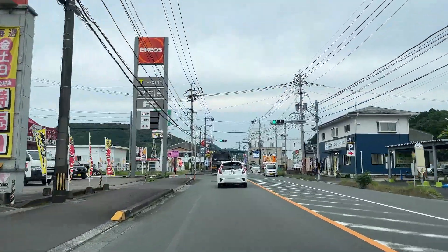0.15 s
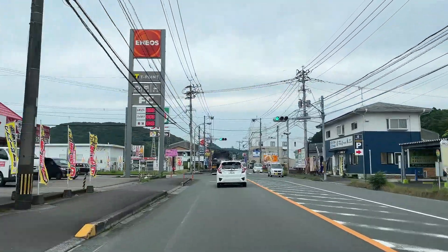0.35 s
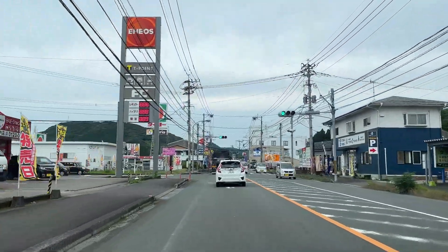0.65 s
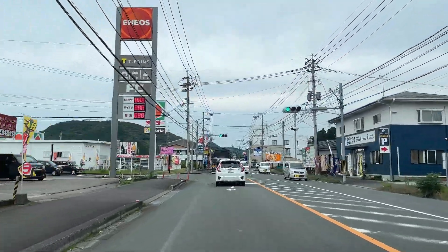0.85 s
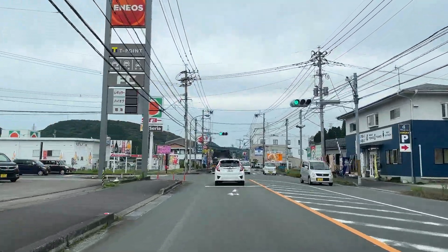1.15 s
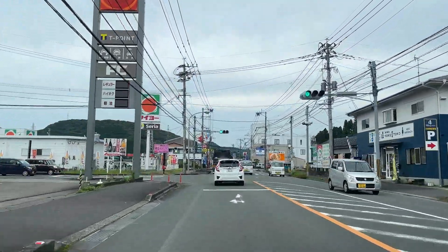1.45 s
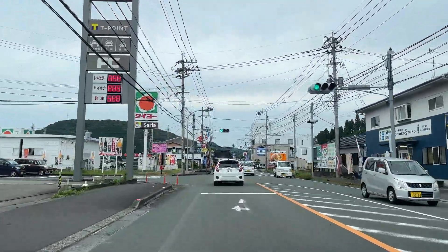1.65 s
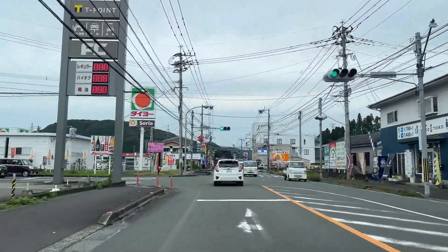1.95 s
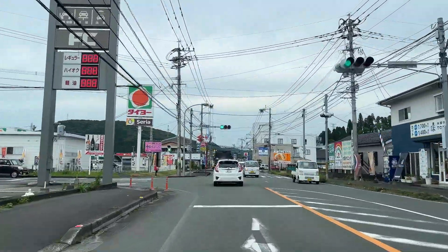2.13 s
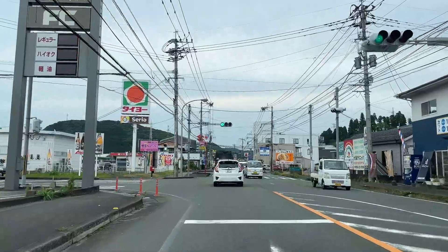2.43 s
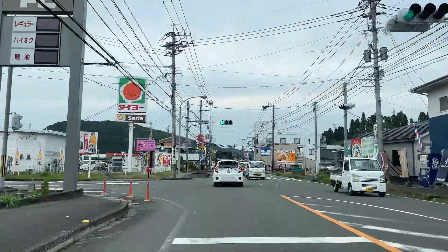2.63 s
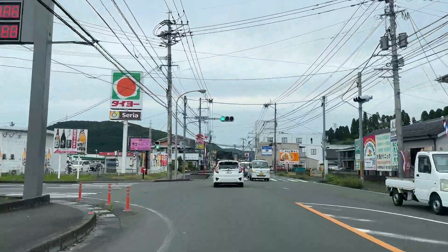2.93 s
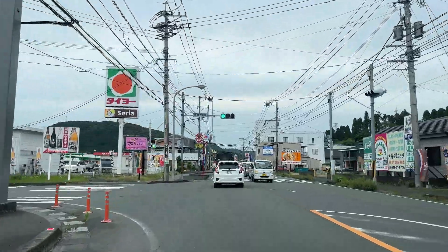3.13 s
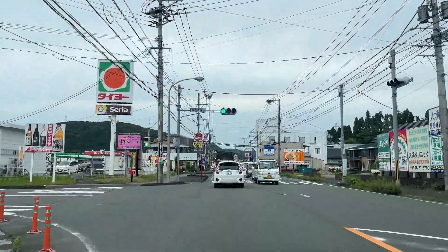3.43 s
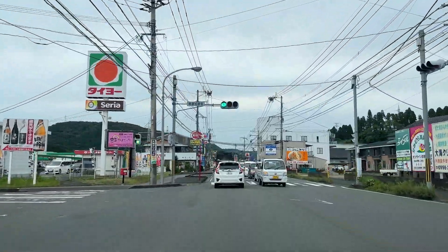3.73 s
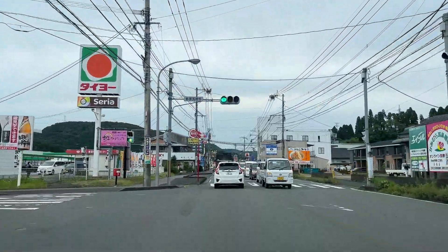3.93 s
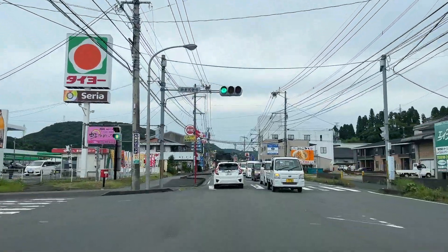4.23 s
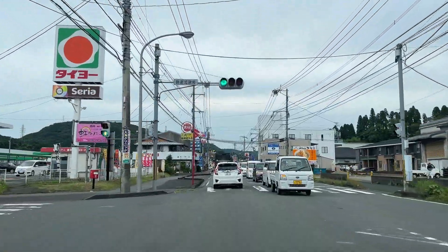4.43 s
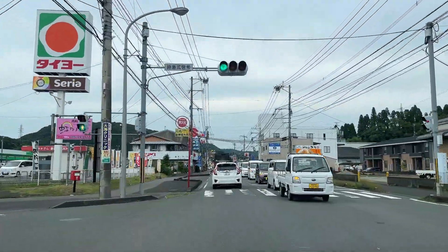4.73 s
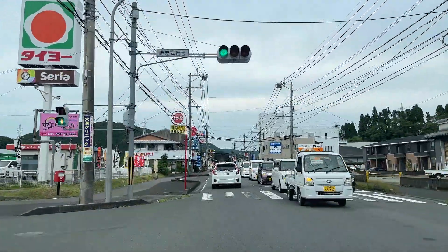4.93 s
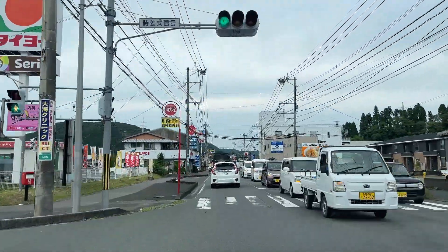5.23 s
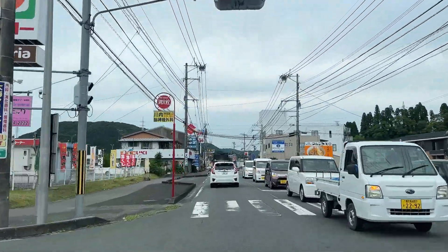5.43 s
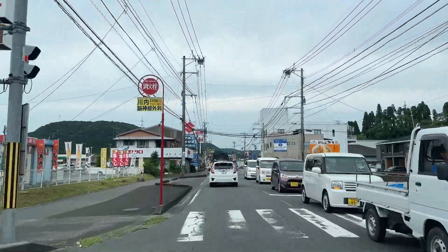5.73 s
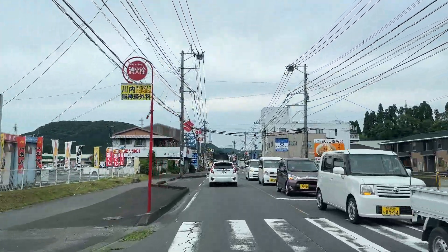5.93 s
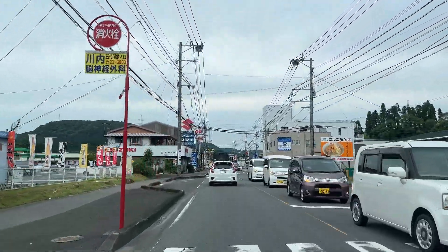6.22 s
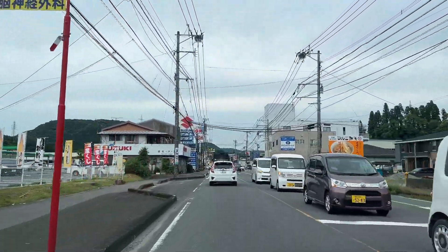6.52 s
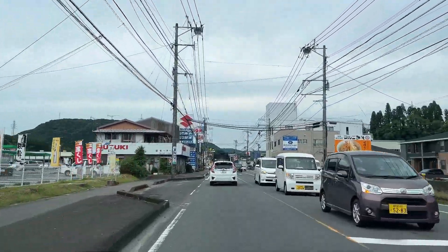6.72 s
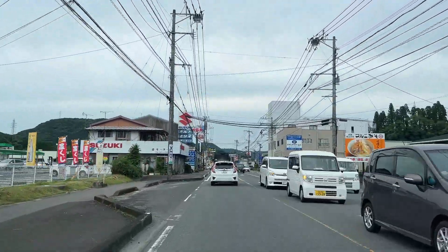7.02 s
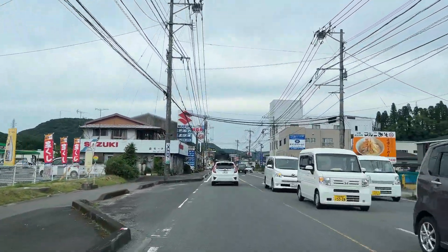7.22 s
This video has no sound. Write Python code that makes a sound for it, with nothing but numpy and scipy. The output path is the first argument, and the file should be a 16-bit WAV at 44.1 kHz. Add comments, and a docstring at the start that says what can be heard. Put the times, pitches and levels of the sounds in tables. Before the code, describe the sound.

The interior of a small car driving steadily through town, heard in stereo from the dashboard. Deep engine and road rumble is continuous, with muffled tyre roar, soft rush and faint hiss. In the first 0.8 s there are small bright ticks, dull seam thuds and a few sharp plastic clicks, strongest near 0.7 s. From 0.9 to 2.5 s it smooths out, with a brief change in tyre sound around 1.5 s and one light click at 1.75 s. Faint trim chatter returns from 2.6 s, clearer at 3.2 s. Thuds and rattles hit at 3.75, 4.03 and 4.3 s, with gritty rubbing, then a dense clatter at 5.0-5.3 s with a strong boom. After that the asphalt sounds coarser and louder, with panel hums, low cabin booms, knocks at 5.75 and 6.4 s, a hard clack at 6.9 s, and small clicks until 7.4 s.

```python
"""Small car in town, heard from the dashboard

Low engine and road rumble, tyre roar, rush and hiss surround a booming cabin; they are shaped noise.
Wheels knock over seams with dull thuds and ringing panels. Loose plastic trim clicks, rubs and chatters:
bursts of noise in its resonances. Small parts fidget when the rumble is strong, and jolts make a panel hum.
The asphalt gets coarser towards the end."""
import sys
import numpy as np
from scipy import signal
from scipy.fft import rfft, irfft, next_fast_len
from scipy.io import wavfile
from scipy.ndimage import uniform_filter1d

SR = 44100
rng = np.random.default_rng(int(sys.argv[2]) if len(sys.argv) > 2 else 0)


def unload_audio(sound):
    """Save the sound as a 16-bit wav file, at the path given as the first command line argument."""
    columns = np.transpose(np.atleast_2d(sound))
    # keep every value between -1 and 1, then stretch to whole-number steps
    steps = np.round(np.clip(columns, -1, 1) * 32767)
    wavfile.write(sys.argv[1], SR, steps.astype(np.int16))


N = 325017
T = np.arange(N) / SR  # s


def gain_of(db):
    """Turns decibels into an amplitude factor."""
    return 10 ** (np.asarray(db) / 20)


def evened(x):
    """Scales a signal to unit power."""
    return x / np.sqrt(np.mean(x ** 2) + 1e-20)


def read(points, hz):
    """A spectrum in dB, joined by straight lines over log frequency."""
    point_hz, value = np.transpose(points)
    return np.interp(np.log(hz + 1), np.log(point_hz + 1), value)


def beyond(points, hz):
    """Above its last point a spectrum falls away steeply."""
    return -60 * np.log10(np.maximum(hz / points[-1][0], 1))


def curve(rows):
    """A time table read at every sample."""
    return np.interp(T, *np.transpose(rows))


def bell(crest_s, half_s):
    """A smooth rise and fall around its crest."""
    return np.exp(-((T - crest_s) / half_s) ** 2)


def swells(rows):
    """The summed strength of a table of swells."""
    return sum(gain_of(level_db) * bell(crest_s, half_s) for crest_s, level_db, half_s in rows)


def add(mix, start_s, sound):
    """Mixes a stereo sound in at its start time."""
    part = mix[:, max(round(start_s * SR), 0):][:, :sound.shape[1]]
    part += sound[:, :part.shape[1]]


def stereo(mid, side):
    """Left and right from the common part and the part that differs."""
    return np.array([mid + side, mid - side])


def noise(colour_db, size=N):
    """Noise of unit power whose spectrum is the function colour_db of frequency."""
    padded = next_fast_len(size, True)
    hz = np.fft.rfftfreq(padded, 1 / SR)
    spectrum = rfft(rng.standard_normal(padded)) * gain_of(colour_db(hz))
    return evened(irfft(spectrum, padded)[:size])


def wash(points, size=N):
    """Noise with a tabled spectrum."""
    return noise(lambda hz: read(points, hz) + beyond(points, hz), size)


def drift(rate_hz, size=N):
    """Slow chance of unit size."""
    return noise(lambda hz: -20 * np.log10(1 + (hz / rate_hz) ** 2), size)


def steadied(x, size=5000):
    """Takes the slow swells out of a narrow noise and keeps its quick beating."""
    power = uniform_filter1d(uniform_filter1d(x ** 2, size), size // 2)
    return x / np.sqrt(power + 1e-6)


def resonance(centre_hz, width_hz):
    """Road noise ringing in one narrow resonance."""
    return noise(lambda hz: -16 * np.log10(1 + (2 * (hz - centre_hz) / width_hz) ** 2))


def sway(hz, wander_hz):
    """One mode swinging freely at unit power, its pitch wandering a little."""
    cycles = np.cumsum(hz + wander_hz * drift(12)) / SR
    return np.sqrt(2) * np.sin(2 * np.pi * (cycles + rng.random()))


def ripple(spacing_hz, hz):
    """Many small panel resonances: random hills and valleys of unit size over frequency."""
    grid_hz = np.arange(0, SR / 2, spacing_hz)
    return np.interp(hz, grid_hz, rng.standard_normal(len(grid_hz)))


def leak(points, ripple_db=2, size=N):
    """Noise that comes in through the panels and takes on their ripple."""
    return noise(lambda hz: read(points, hz) + beyond(points, hz) + ripple_db * ripple(45, hz), size)


# spectrum of the rumble: pitch_hz, relative level_db [dB per Hz]
RUMBLE_SPECTRUM = [(15, -47), (25, -22.5), (35, -2), (47, -4), (58, 3), (68, -4.5), (80, -8.5),
                   (100, -10.5), (140, -18), (200, -28), (300, -74)]
# the rumble over time, before its lift: time_s, level_db
RUMBLE_LEVEL = [(0.0, -36), (0.79, -40), (0.85, -43), (2.44, -44), (2.83, -39), (3.33, -37.5), (3.61, -43),
                (4.37, -40), (4.7, -43.5), (4.95, -40.5), (5.62, -37.5), (5.85, -41.5), (6.85, -36),
                (7.37, -41.5)]
# dips in the road that heave the floor: crest_s, level_db, half_length_s
HEAVES = [(0.18, -27, 0.016), (0.33, -30, 0.01), (0.58, -29, 0.0099), (0.7, -32.5, 0.09),
          (0.92, -36, 0.034), (1.8, -35.5, 0.022), (2.65, -31, 0.018), (2.79, -30.5, 0.035),
          (3.12, -35, 0.06), (3.3, -33.5, 0.076), (3.76, -27.5, 0.018), (5.5, -28.5, 0.013),
          (5.76, -28.5, 0.041), (6.36, -29.5, 0.017), (6.76, -28.5, 0.021)]


def rumble(lift_db=2.5, waver_db=0.98, heave_hz=54, heave_width_hz=24):
    """Engine and road rumble come through the floor; each dip in the road heaves it at a deep pitch."""
    level_db = curve(RUMBLE_LEVEL) + lift_db + waver_db * drift(27)
    rolling = gain_of(level_db) * steadied(wash(RUMBLE_SPECTRUM), size=3600)
    heaving = swells(HEAVES) * steadied(resonance(heave_hz, heave_width_hz), size=2400)
    return rolling + heaving


# panels that drone all the way: pitch_hz, width_hz, level_db
DRONES = [(374, 14, -63), (427.6, 18, -68)]
# jolts that make the deeper panel hum out, before the mid and side levels: crest_s, level_db, half_length_s
JOLTS = [(.97, -48, 0.011), (1.3, -45, 0.023), (1.62, -50, 0.04), (5.28, -46, 0.022), (5.64, -48, .016),
         (5.76, -39.5, 0.024), (6.14, -46.5, 0.012), (6.205, -42.5, .018), (6.275, -44.5, .02),
         (6.43, -44.5, 0.035), (6.72, -48, 0.014), (6.995, -41.5, 0.021), (7.33, -46, 0.02)]


def drone(waver_db=2, wander_hz=14, mid_db=-3, side_db=-4):
    """Body panels sing softly at their own pitches; a jolt makes the deeper one hum out."""
    singing = sum(gain_of(level_db + waver_db * drift(2.6)) * resonance(pitch_hz, width_hz)
                  for pitch_hz, width_hz, level_db in DRONES)
    deep_hz = DRONES[0][0]
    mid = gain_of(mid_db) * sway(deep_hz, wander_hz)
    side = gain_of(side_db) * sway(deep_hz, wander_hz)
    return singing + swells(JOLTS) * stereo(mid, side)


# coarseness of the asphalt, of which only the departure from the mean counts: time_s, level_db
COARSENESS = [(0.0, -53.5), (0.31, -53.5), (0.57, -50.5), (0.79, -50.5), (0.86, -55), (1.62, -54.5),
              (2.03, -54), (2.81, -55), (3.0, -52), (3.84, -51.5), (4.19, -50), (4.82, -50.5), (5.17, -46),
              (5.77, -47), (6.8, -47), (7.14, -47), (7.37, -44.5)]
# patches of asphalt that change the tyre sound: crest_s, roar_lift_db, half_length_s, rush_lift_db
PATCHES = [(0.753, 5.5, 0.027, -4), (1.327, 4.5, 0.053, 4), (1.484, 7, 0.022, 1), (1.607, 5, 0.074, 4),
           (4.054, 7.5, 0.033, 1), (5.24, 5.5, 0.053, 0), (5.767, 8.5, 0.011, 1), (6.207, 1.5, 0.04, 1),
           (6.44, 6.5, 0.033, 4.5), (6.981, 6, 0.045, 0)]


def road_surface():
    """The asphalt under the tyres in dB: its coarseness, then what its patches do to roar and rush."""
    coarse_db = curve(COARSENESS) - curve(COARSENESS).mean()
    roar_db = sum(lift_db * bell(crest_s, half_s) for crest_s, lift_db, half_s, _ in PATCHES)
    rush_db = sum(lift_db * bell(crest_s, half_s) for crest_s, _, half_s, lift_db in PATCHES)
    return coarse_db, roar_db, rush_db


# spectrum of the roar common to both ears: pitch_hz, relative level_db [dB per Hz]
ROAR_MID = [(90, -52.5), (160, 4), (195, 1), (240, -2.5), (320, -7.5), (372, -8), (402, -12), (432, -11.5),
            (480, -13.5), (620, -23), (900, -49), (1500, -70.5)]
# spectrum of the roar that differs between the ears: pitch_hz, relative level_db [dB per Hz]
ROAR_SIDE = [(20, -34.5), (50, -3), (80, -3), (105, -9.5), (140, -1.5), (220, -8.5), (290, -4.5),
             (365, -4.5), (430, -12.5), (490, -20.5), (565, -10), (650, -26.5), (900, -26), (1500, -68.5)]


def tyres(coarse_db, patch_db, mid_db=-49, side_db=-49.5, follow=0.95, grain_db=2.0):
    """The tyres roar with the coarseness of the asphalt and flutter with its grain."""
    mid = gain_of(mid_db) * steadied(wash(ROAR_MID))
    side = gain_of(side_db) * wash(ROAR_SIDE)
    return stereo(mid, side) * gain_of(follow * coarse_db + patch_db + grain_db * drift(27))


# spectrum of the tyre rush: pitch_hz, relative level_db [dB per Hz]
RUSH = [(300, -4), (700, 7.5), (1000, 0.5), (1170, 3.5), (1500, 0.5), (2000, -6), (3000, -13.5),
        (5000, -31), (7000, -46.5)]
# spectrum of the hiss: pitch_hz, relative level_db [dB per Hz]
HISS = [(1000, -16.5), (2200, -2), (3000, -3.5), (4300, -3), (5100, -9), (5800, -19), (6800, -28),
        (9000, -22), (13000, -19.5), (16000, -40)]
# the hiss over time, before its trim in level: time_s, level_db
HISS_LEVEL = [(0.0, -73), (0.29, -79), (0.79, -80), (0.84, -85), (1.4, -82.5), (1.7, -78), (2.4, -80),
              (2.81, -82), (3.3, -70), (3.78, -84), (4.23, -78), (4.43, -71.5), (4.78, -77), (5.13, -71),
              (6.4, -78), (7.27, -75), (7.37, -74)]


def air(coarse_db, patch_db, rush_db=-68, rush_side_db=2.0, follow=0.75, hiss_db=-2, flutter_db=2.1,
        hiss_share=0.73):
    """Tyre rush and hiss leak in through the panels, flutter, and change with each patch of road."""
    flutter = flutter_db * drift(8.8) + patch_db
    rush = stereo(leak(RUSH), gain_of(rush_side_db) * leak(RUSH))
    hiss = stereo(leak(HISS), leak(HISS))
    rush_gain = gain_of(rush_db + follow * coarse_db + flutter)
    hiss_gain = gain_of(curve(HISS_LEVEL) + hiss_db + hiss_share * flutter)
    return rush * rush_gain + hiss * hiss_gain


# the cabin boom over time, before its lift: time_s, level_db
BOOM_LEVEL = [(0.0, -44), (0.43, -51.5), (0.72, -45), (1.31, -55.5), (1.6, -47.5), (3.2, -49.5),
              (3.69, -44.5), (5.23, -45), (5.56, -45), (5.7, -42.5), (7.27, -38), (7.37, -40)]
# hard shakes that swell the boom: crest_s, level_db, half_length_s
SHAKES = [(1.55, -38.5, 0.074), (3.62, -40.5, 0.098), (5.211, -22, 0.028), (5.945, -33.5, 0.03),
          (6.082, -28, 0.031), (6.5, -34.5, 0.018), (7.15, -26.5, 0.024)]
BOOM_HZ, BOOM_WIDTH_HZ = 139.78, 12.1


def boom(lift_db=3.5, waver_db=1.8):
    """The road drives one air resonance of the cabin; hard shakes make it swell."""
    level_db = curve(BOOM_LEVEL) + lift_db + waver_db * drift(16)
    rolling = gain_of(level_db) * steadied(resonance(BOOM_HZ, BOOM_WIDTH_HZ))
    return rolling + swells(SHAKES) * sway(BOOM_HZ, wander_hz=3)


# broad spectrum of the plastic trim: pitch_hz, relative level_db [dB per Hz]
TRIM_SPECTRUM = [(300, -36), (800, -3.5), (1500, 1), (2100, 5.5), (4000, 6), (6000, -4.5), (6800, -6.5),
                 (8500, -11.5), (10500, -9), (14000, -14.5), (15500, -25)]
# resonances of the trim: pitch_hz, width_hz, lift_db
TRIM_MODES = [(1210, 80, 1.5), (2050, 170, 7), (2650, 140, 5.5), (3160, 190, 5), (3365, 50, 7),
              (3680, 71, 6.5), (4090, 110, 7), (4550, 97, 4.5), (4880, 110, 5.5), (5200, 71, 4.5),
              (6020, 56, 6), (7160, 98, 2.5), (7750, 150, 1.5)]


def plastic(hz):
    """The colour of the trim in dB: its broad spectrum and its resonances."""
    modes_db = sum(lift_db / (1 + (2 * (hz - pitch_hz) / width_hz) ** 2)
                   for pitch_hz, width_hz, lift_db in TRIM_MODES)
    return read(TRIM_SPECTRUM, hz) + modes_db


# flexing trim rubs, before colour and grain: crest_s, level_db, half_length_s, favoured pitch_hz
RUBS = [(0.088, -75, 0.058, 3500), (0.647, -75, 0.069, 4500), (0.775, -69, 0.023, 4600),
        (3.259, -69, 0.13, 4300), (3.546, -71.5, 0.076, 4100), (3.837, -70.5, 0.12, 5200),
        (4.159, -67.5, 0.17, 5000), (4.339, -60.5, 0.069, 4200), (5.718, -75, 0.13, 5000),
        (7.261, -65.5, 0.059, 5000)]


def rub(pan_db=6, grain_db=3, treble_db=0, focus_db=6, focus_width_hz=600):
    """Flexing trim rubs with a faint gritty rustle, more on the left, each time at its own pitch."""
    out = np.zeros((2, N))
    tilt = [(1000, -8), (3000, -10), (5500, -0.5), (8000, treble_db)]  # Hz, dB
    for crest_s, level_db, half_s, pitch_hz in RUBS:
        t = np.arange(-3 * half_s, 3 * half_s, 1 / SR)
        focus = lambda hz: focus_db / (1 + ((hz - pitch_hz) / focus_width_hz) ** 2)
        colour = lambda hz: plastic(hz) + focus(hz) + read(tilt, hz)
        rustle = np.array([noise(colour, len(t)), gain_of(-pan_db) * noise(colour, len(t))])
        grain = gain_of(level_db + grain_db * drift(70, len(t)))
        stroke = rustle * np.exp(-(t / half_s) ** 2) * grain
        add(out, crest_s + t[0], stroke[:, crest_s + t >= 0])
    return out


# how much of a contact's left-right difference each pitch takes on: pitch_hz, share
TRIM_SIDE = [(1000, 0.12), (2200, 0.0086), (3600, 0.46), (5500, 2.1), (7500, 0.73), (10000, .1)]
CONTACT_RISE_S = 0.0032
EAR_DELAY_S = 0.0004  # longest delay between the ears
CONTACT_FOCUS_DB, CONTACT_FOCUS_HZ = 6.5, 230  # height and half width of the part's own resonance


def click(level_db, decay_s, body_db, treble_db, pan_db, pitch_hz, tail_db=-20, tail_decay_s=0.055,
          chatter_db=2.5, grit_db=1.3, direct=0.5, size=12000):
    """One contact of loose plastic: a chattering burst in its resonances, then the short cabin tail."""
    t, hz = np.arange(size) / SR, np.fft.rfftfreq(size, 1 / SR)
    # each contact touches a different spot, which favours other resonances
    spot = 1.3 * ripple(650, hz) + 3.2 * ripple(110, hz)
    focus = CONTACT_FOCUS_DB / (1 + ((hz - pitch_hz) / CONTACT_FOCUS_HZ) ** 2)
    hardness = read([(1300, body_db), (2600, 0), (5500, 0), (8500, treble_db)], hz)
    colour = evened(gain_of(plastic(hz) + spot + focus + hardness))
    ears = gain_of(np.outer([0.5, -0.5], pan_db * read(TRIM_SIDE, hz)))
    # the surfaces catch and slip several times within one contact
    chatter = gain_of(chatter_db * drift(300, size) + grit_db * drift(1800, size))
    burst = np.exp(-t / decay_s) * chatter
    # a brief snap stirs the cabin less than a long scrape
    tail = gain_of(tail_db) * min(decay_s / 0.0087, 1) ** 2 * np.exp(-t / tail_decay_s)
    shape = (1 - np.exp(-t / CONTACT_RISE_S)) ** 2 * (burst + tail)
    # the direct sound reaches both ears, one a little later; the reflections differ
    shared = rng.standard_normal(size)
    lag = round(rng.uniform(-1, 1) * EAR_DELAY_S * SR)
    direct_sound = np.array([shared, np.roll(shared, lag)])
    reflections = rng.standard_normal((2, size))
    grit = np.sqrt(direct) * direct_sound + np.sqrt(1 - direct) * reflections
    return gain_of(level_db) * shape * irfft(rfft(grit) * colour * ears, size)


LIFT_OFF_DB = -42.5  # RUMBLE_LEVEL must pass this to shake the trim loose


def fidgets(level_db=-73, spread_db=5, follow=0.37, decay_s=0.0095, body_db=0, treble_db=8, pan_db=11.0,
            pitch_hz=5300, count=45):
    """Faint contacts of the trim at random, more often and louder the harder the car rumbles."""
    out = np.zeros((2, N))
    shaking_db = np.maximum(curve(RUMBLE_LEVEL) - LIFT_OFF_DB, 0)
    effort = np.cumsum(shaking_db + 1e-9)
    when, strength = rng.random((count, 2)).T
    # each contact takes an equal share of the summed shaking
    starts_s = np.interp((np.arange(count) + when) / count, effort / effort[-1], T)
    levels_db = level_db + spread_db * strength ** 2 + follow * np.interp(starts_s, T, shaking_db)
    for start_s, contact_db in zip(starts_s, levels_db):
        add(out, start_s, click(contact_db, decay_s, body_db, treble_db, pan_db, pitch_hz))
    return out


# spectrum of a tick: pitch_hz, relative level_db [dB per Hz]
TICK_SPECTRUM = [(2000, -16.5), (3500, 0.5), (6000, -7), (7400, 0), (8800, -2.5), (10500, -9), (13500, -22),
                 (15500, -34)]
# taps of a small hard part, before their envelope: time_s, level_db
TICKS = [(0.196, -53), (.208, -64), (.324, -54), (0.391, -66.5), (4.45, -57)]


def ticks(pan_db=5, rise_s=0.0013, decay_s=0.008, size=4000):
    """A small hard part taps brightly, more on the left, and dies at once."""
    out, t = np.zeros((2, N)), np.arange(size) / SR
    tap = (1 - np.exp(-t / rise_s)) * np.exp(-t / decay_s)
    for time_s, level_db in TICKS:
        ears = np.array([wash(TICK_SPECTRUM, size), gain_of(-pan_db) * wash(TICK_SPECTRUM, size)])
        add(out, time_s - 0.001, gain_of(level_db) * tap * ears)  # starts 1 ms early
    return out


# ringing of the body panels: pitch_hz, decay_s
PANEL_MODES = [(450, 0.028), (555, 0.014), (728, 0.03), (790, 0.013), (865, 0.01)]
PANEL_SPREAD_OCT = 0.14  # how far from its favoured pitch a blow still reaches


def panel_ring(pitch_hz, t, rise_s=0.0026):
    """The panels ring on after a blow, most strongly near the pitch that its place favours."""
    mode_hz, decay_s = np.transpose(PANEL_MODES)[:, :, None]
    reach = 1 / (1 + (np.log2(mode_hz / pitch_hz) / PANEL_SPREAD_OCT) ** 2)
    reach = reach / np.linalg.norm(reach)
    phase = rng.random((2, len(mode_hz), 1))  # each ear has its own
    swing = np.sin(2 * np.pi * (mode_hz * t + phase))
    return (1 - np.exp(-t / rise_s)) * (reach * np.exp(-t / decay_s) * swing).sum(1)


# spectrum of the thud: pitch_hz, relative level_db [dB per Hz]
KNOCK_SPECTRUM = [(100, -19.5), (250, 5), (380, 9.5), (480, -3.5), (580, -2), (680, -10), (850, -12.5),
                  (1050, -12), (1500, -20.5), (2500, -26.5), (6000, -65.5)]
# wheels over seams, levels before the envelopes:
# start_s, level_db, decay_s, favoured pitch_hz, ring_level_db, hardness_db (lift from 600 Hz up)
KNOCKS = [(.09, -52, .025, 555, -50, -2), (.475, -43, 0.013, 550, -55, 1.5), (.614, -39, 0.01, 507, -36, 4),
          (0.697, -32.5, 0.0077, 545, -37.5, 3), (3.753, -39.5, 0.033, 844, -37.5, 5),
          (4.011, -38, .018, 770, -39, 1.5), (4.035, -42.5, 0.0087, 550, -47, 3),
          (4.3, -44, 0.027, 504, -46, -0.5), (4.81, -44, 0.0088, 790, -69, 2),
          (4.998, -46, 0.067, 610, -35.5, 9), (5.02, -43, 0.032, 830, -42, 2),
          (5.261, -36.5, 0.031, 880, -36, 1.5), (5.753, -37, 0.0086, 450, -46, -5),
          (5.931, -46.5, 0.015, 550, -50.5, 3), (6.2, -49, 0.024, 725, -53, 1),
          (6.444, -42, 0.0067, 454, -49, 0), (6.895, -46, 0.013, 555, -45.5, 0),
          (6.913, -39, 0.015, 550, -52, -3), (6.978, -43, 0.017, 444, -43, 2)]


def knocks(side_db=1, rise_s=0.0069, size=12000):
    """A wheel meets a seam: a short dull thud, and the body panels ring."""
    out, t = np.zeros((2, N)), np.arange(size) / SR
    for start_s, level_db, decay_s, pitch_hz, ring_db, hard_db in KNOCKS:
        blow = (1 - np.exp(-t / rise_s)) * np.exp(-t / decay_s)
        hardness = lambda hz: read([(420, 0), (600, hard_db)], hz)
        colour = lambda hz: read(KNOCK_SPECTRUM, hz) + beyond(KNOCK_SPECTRUM, hz) + hardness(hz)
        mid, side = (steadied(noise(colour, size), size=600) for _ in range(2))
        thud = gain_of(level_db) * blow * stereo(mid, gain_of(side_db) * side)
        add(out, start_s, thud + gain_of(ring_db) * panel_ring(pitch_hz, t))
    return out


# loose trim rattles, levels before the envelope: start_s, level_db, contacts [count], decay_s, body_lift_db,
# treble_lift_db, pan_db (left over right, scaled by TRIM_SIDE), favoured pitch_hz
RATTLES = [(0.086, -46.5, 1, 0.0057, 6, -13, 1, 4300), (0.178, -42.5, 1, 0.0042, 19, 5, 2, 2700),
           (0.614, -50, 1, 0.0077, 8, -10, 4, 2530), (0.639, -56.5, 1, 0.0056, -3, 1, 7, 4780),
           (0.6942, -34, 1, 0.0061, 17, -11, -1.5, 2850), (0.711, -52, 1, 0.0071, 12, -14, .5, 1390),
           (0.792, -40.5, 1, 0.0028, 20, -28, 3, 1450), (1.749, -53, 1, 0.0073, 19.5, 2, 10, 5030),
           (2.297, -67.5, 1, 0.0079, -5, 10, 8, 10800), (2.454, -63.5, 1, 0.0077, -3, 4, 5, 11000),
           (2.585, -62, 1, 0.015, 12, -2, 12, 5200), (2.641, -65.5, 1, 0.0069, -2, 9, 16, 5700),
           (2.742, -63, 1, 0.007, -2, 9, 9, 11000), (2.787, -60, 1, 0.011, -1, 8, 10, 5300),
           (2.827, -57, 1, 0.011, 14.5, 7, 5.5, 5300), (2.916, -66, 1, 0.014, -4, 2, 10, 5700),
           (3.04, -64.5, 1, 0.013, -2, 6, 11, 6070), (3.086, -57.5, 1, 0.0079, -1, 4, 12.5, 5750),
           (3.161, -46.5, 1, 0.01, 0, 4.5, 1, 2250), (3.172, -52.5, 1, 0.0087, -4, 5, 7, 4020),
           (3.197, -55, 1, 0.0095, -6, 7, 15, 4100), (3.217, -53, 1, 0.0082, -11, 10.5, 14, 4900),
           (3.262, -61, 1, .008, -5, 8, 13, 4870), (3.301, -62, 1, 0.0064, -4, 1, 19, 4900),
           (3.455, -65, 1, 0.0094, -6, 6, 9, 4100), (3.526, -59, 1, 0.011, 14, 3, -2, 4100),
           (3.561, -58, 1, 0.0075, 2, -8, 5, 4100), (3.726, -49, 1, 0.019, -3, 9, -8, 2380),
           (3.744, -46.5, 1, 0.0087, 10, 13, 18, 4740), (3.756, -45.5, 1, 0.008, 4, 6, 19, 5300),
           (3.772, -53.5, 1, 0.026, 17, 0, 12, 3280), (3.959, -50.5, 1, 0.014, 3, 5, 10, 3350),
           (4.009, -52, 1, 0.022, 4, 4, 8.5, 4130), (4.036, -35.5, 1, 0.0078, 6, 1.5, 7, 2100),
           (4.085, -50, 1, 0.0081, -7, 6, 16, 3580), (4.198, -55.5, 1, 0.0078, -4, 6, -2, 4100),
           (4.269, -38.5, 1, 0.0075, -1, 4.5, 13, 4100), (4.276, -37.5, 1, 0.0066, -3, 3, 14.5, 5130),
           (4.302, -40.5, 1, 0.012, 2, 0, 7, 3980), (4.415, -51.5, 2, 0.013, 9, 0, 8, 3750),
           (4.674, -65.5, 1, 0.013, 1, 13, 9, 5300), (4.725, -52, 1, 0.0081, -16, 8, 12.5, 5530),
           (4.86, -57, 1, 0.011, 13, 2, 6.5, 4900), (4.896, -56.5, 1, 0.0075, 3, 0, 11.5, 5300),
           (4.965, -54.5, 1, 0.014, 6, 6, 6, 6000), (4.979, -48, 1, .02, 2, 7, 9, 4100),
           (4.992, -44.5, 1, 0.018, 5, 9, 5, 7400), (5.009, -45.5, 1, 0.011, 2, 9, 14, 1300),
           (5.022, -43.5, 1, 0.022, -1, 5, 8, 4560), (5.056, -36.5, 1, 0.0048, -22, 7, 13, 5330),
           (5.154, -57, 1, 0.0058, -4, 8, 3, 5400), (5.22, -46, 1, 0.017, 6, -3, -5, 2030),
           (5.228, -35, 1, 0.006, 10, 12, 19.5, 6160), (5.256, -43, 1, 0.0098, 4, 9, -6, 2700),
           (5.272, -33, 1, 0.0072, 5, 4, 8, 3820), (5.379, -49.5, 1, 0.0052, 12, 0, 7, 5300),
           (5.509, -52.5, 1, 0.0075, 7, -4, 6, 4940), (5.584, -55, 1, 0.0065, 3, 5, 3, 5230),
           (5.677, -60.5, 1, 0.0062, -3, 6, 12, 5700), (5.708, -56, 1, 0.013, 19.5, 5.5, 7, 4940),
           (5.75, -50.5, 1, .012, 26, 4.5, 0, 1400), (5.84, -57.5, 1, 0.0063, -3, 3.5, 4, 4930),
           (5.931, -46.5, 1, 0.0069, 21, 1, 5.5, 1530), (6.074, -59.5, 1, 0.0058, 0, 5.5, 8, 5200),
           (6.247, -61.5, 1, 0.0057, 3, 8, 6, 5250), (6.293, -61, 1, 0.0047, 1, 6, 13, 5670),
           (6.4, -65.5, 1, 0.011, -5, 8.5, 7.5, 4900), (6.494, -62, 1, 0.0066, -1.5, 8, 7.5, 5300),
           (6.581, -65, 1, 0.011, 0, 5.5, 7, 5670), (6.615, -56.5, 1, 0.0086, 20, 8, 11, 5300),
           (6.886, -62, 1, 0.042, -1, 7, 7, 4870), (6.913, -30, 1, 0.0035, 14, -1.5, 1, 1210),
           (6.983, -55, 1, 0.01, 17.5, 7, 5, 4900), (7.18, -49, 1, 0.0085, 20.5, 6, 8.5, 5300),
           (7.235, -57.5, 1, 0.0088, -2, 12, 6.5, 4900), (7.265, -58, 1, 0.0077, 0, 19, 6, 4100)]
# a shaken panel strikes again after this time, give or take the scatter, and loses this much
BOUNCE_S, BOUNCE_SCATTER_S, BOUNCE_LOSS_DB = 0.019, 0.00202, 0.5


def trim():
    """A jolted panel strikes once or bounces on, a little weaker each time."""
    out = np.zeros((2, N))
    for start_s, level_db, contacts, *contact in RATTLES:
        for bounce in range(round(contacts)):
            add(out, start_s, click(level_db - bounce * BOUNCE_LOSS_DB, *contact))
            start_s += BOUNCE_S + BOUNCE_SCATTER_S * rng.uniform(-1, 1)
    return out


def scene():
    """All that is heard from the dashboard; the rumble and the boom are the same in both ears."""
    coarse_db, roar_db, rush_db = road_surface()
    road = rumble() + drone() + tyres(coarse_db, roar_db) + air(coarse_db, rush_db)
    cabin = boom() + rub() + fidgets() + ticks()
    return road + cabin + knocks() + trim()


EDGE_HZ = 15700  # upper band limit


def record(dry, low_cut_hz=33):
    """The microphone sheds the deepest bass; then the recorder's band limit cuts the top."""
    low_cut = signal.butter(3, low_cut_hz, "high", fs=SR, output="sos")
    lean = signal.sosfilt(low_cut, dry)
    band_limit = signal.firwin(511, EDGE_HZ, window=("kaiser", 9), fs=SR)
    return signal.oaconvolve(lean, band_limit[None], "same", axes=1)


dry = scene()
out = record(dry)
unload_audio(out)
```